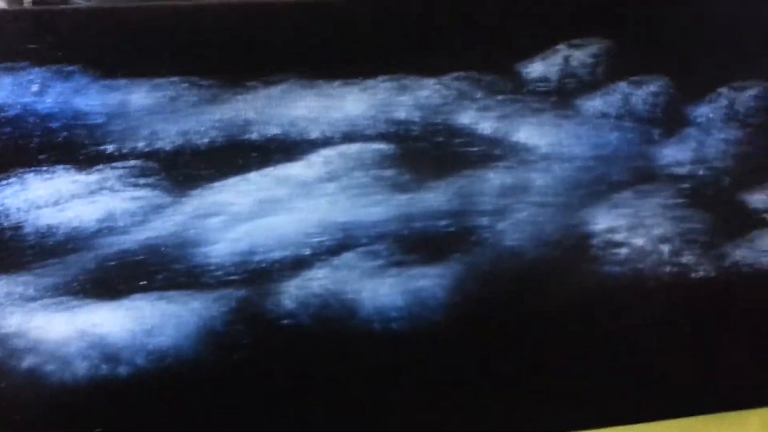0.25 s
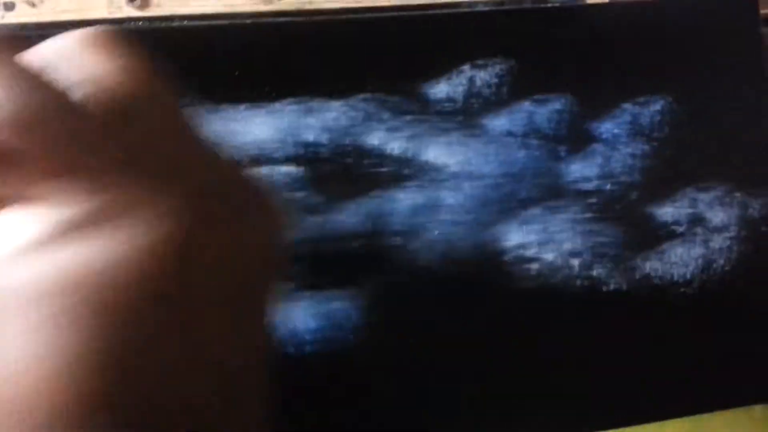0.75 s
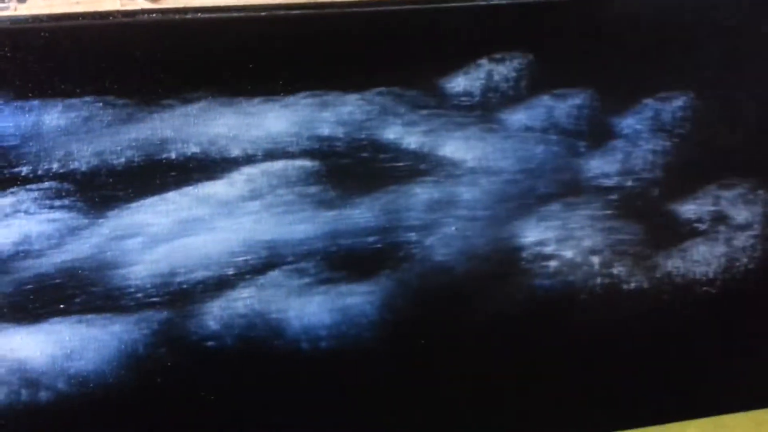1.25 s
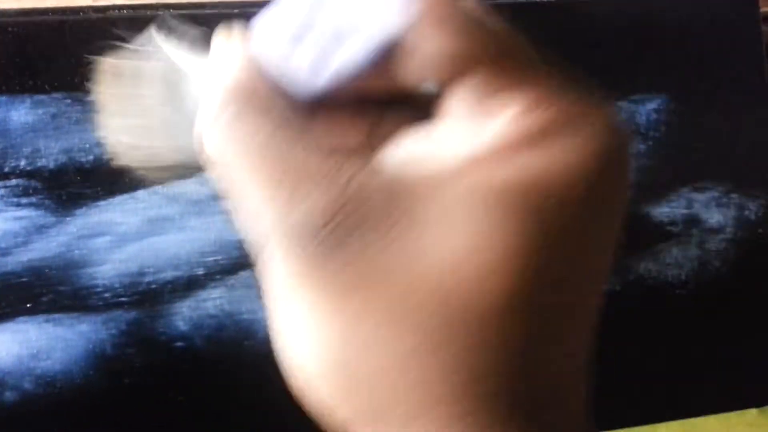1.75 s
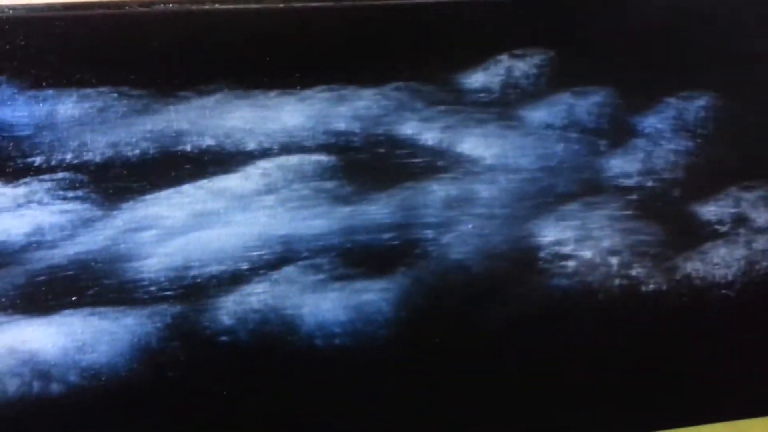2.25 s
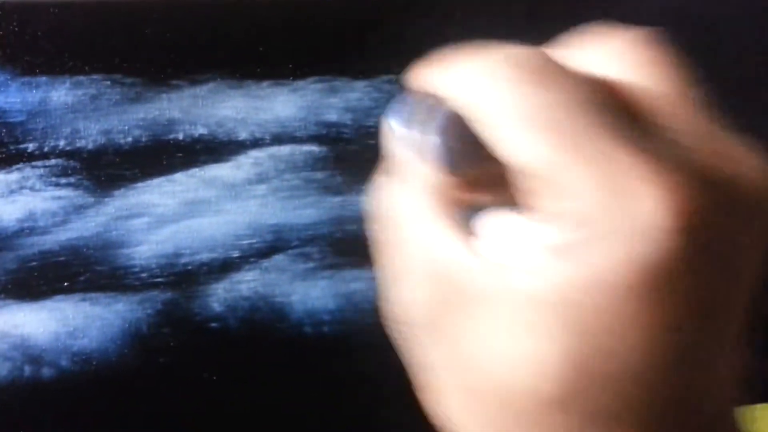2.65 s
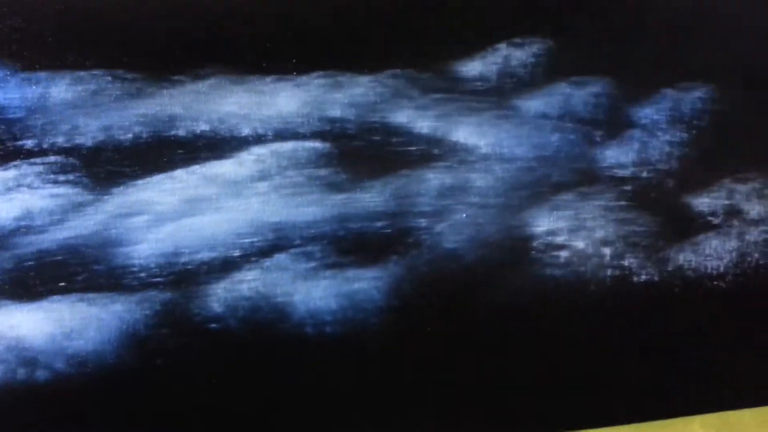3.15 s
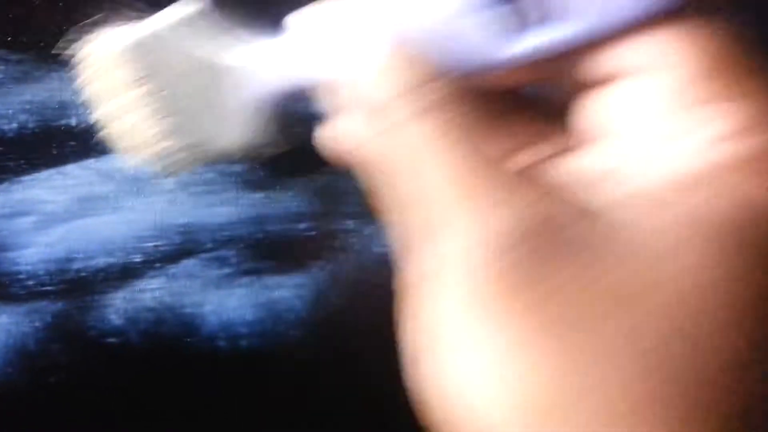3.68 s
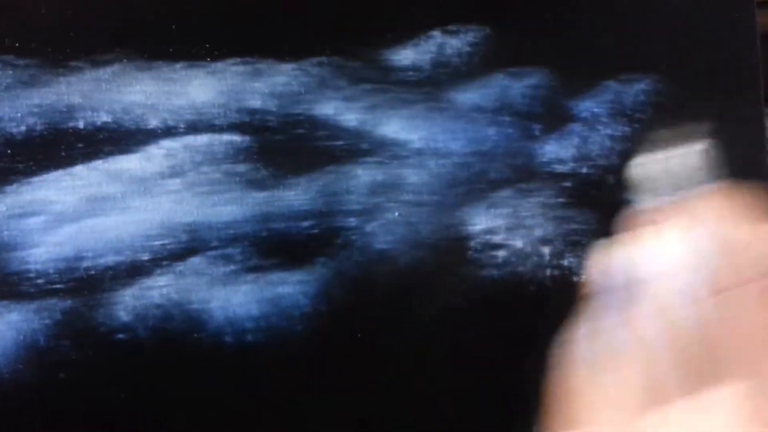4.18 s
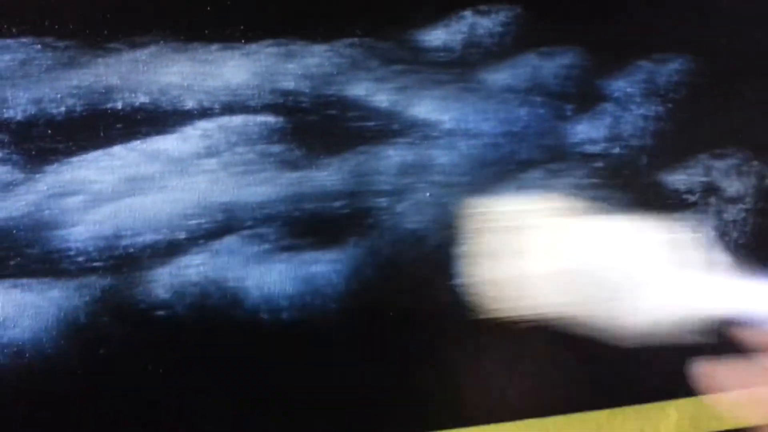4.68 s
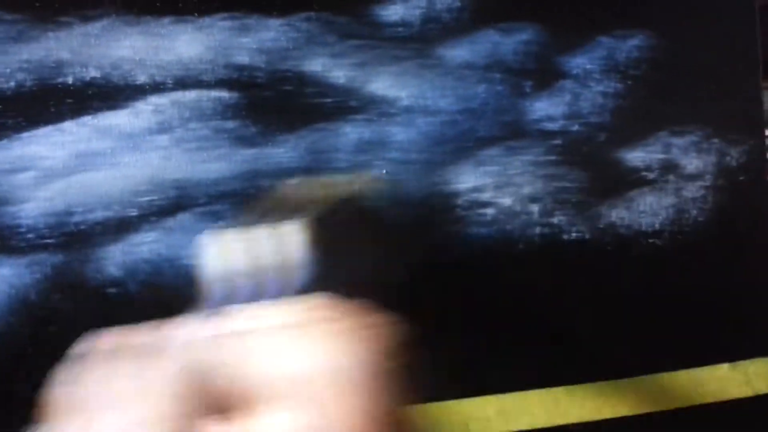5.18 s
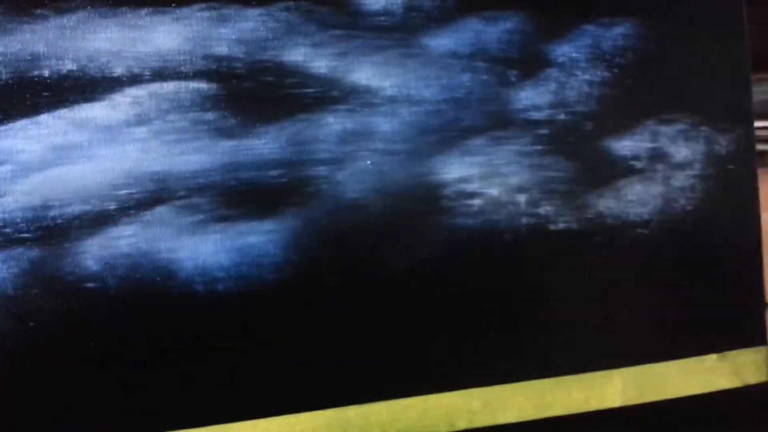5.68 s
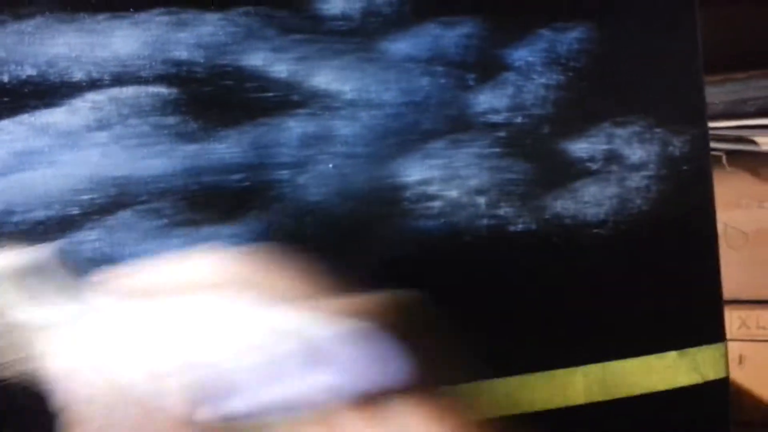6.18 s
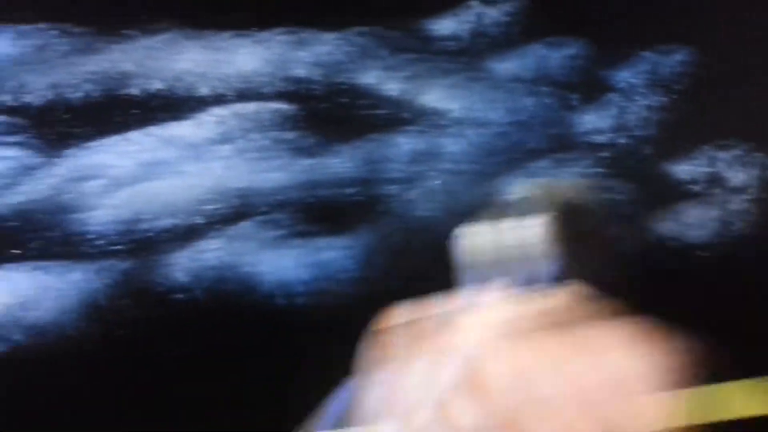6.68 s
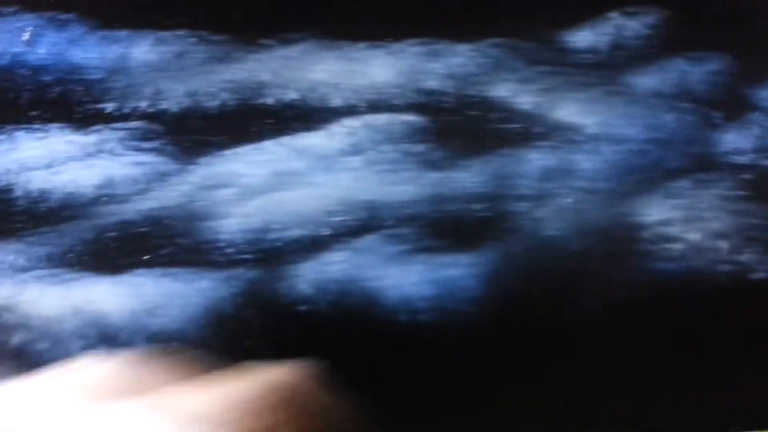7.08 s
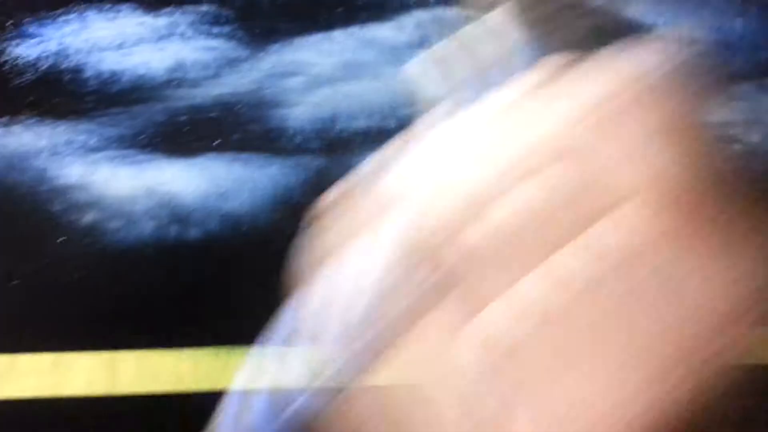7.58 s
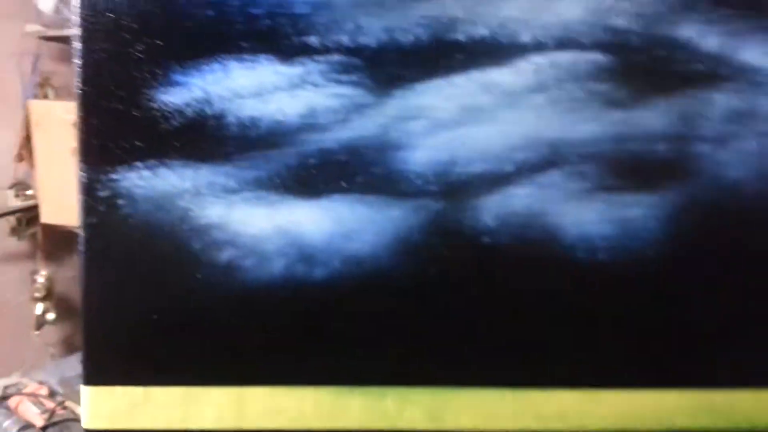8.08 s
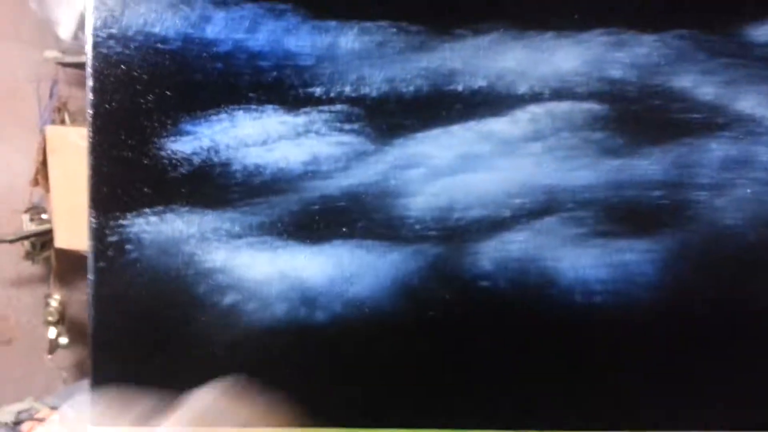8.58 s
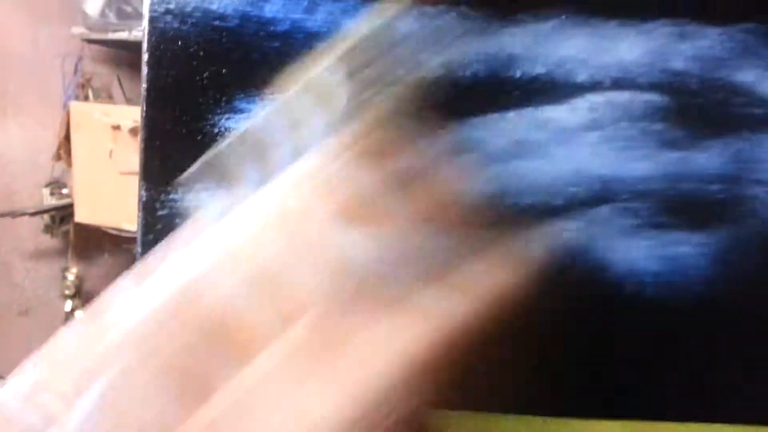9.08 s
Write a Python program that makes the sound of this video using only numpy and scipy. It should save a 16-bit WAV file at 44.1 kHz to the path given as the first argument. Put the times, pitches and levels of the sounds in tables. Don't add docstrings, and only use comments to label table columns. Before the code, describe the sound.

Close, scratchy brush strokes sweep left and right on taut canvas, growing faster and crisper, with soft frame bumps and distant engines droning beneath.

```python
import sys
import numpy as np
from scipy import signal
from scipy.fft import rfft, irfft, next_fast_len
from scipy.io import wavfile
from scipy.ndimage import map_coordinates

SR = 44100
rng = np.random.default_rng(int(sys.argv[2]) if len(sys.argv) > 2 else 0)


def dump(signal):
    limited = np.clip(np.atleast_2d(signal).T, -1, 1)
    pcm = np.round(limited * 32767).astype(np.int16)
    wavfile.write(sys.argv[1], SR, pcm)


def magnitude_from_level(level_db):
    exponent = np.asarray(level_db, float) / 20
    return 10 ** exponent


N = 411894
TIME, SIZE = np.arange(N) / SR, next_fast_len(N)
HZ = np.maximum(np.fft.rfftfreq(SIZE, 1 / SR), 1)

# landing, hardest moment and lift in seconds,
# landing level and hardest level in dB.
STROKES = [(0.0, 0.096, 0.242, -43.4, -36.0), (0.511, 0.693, 0.78, -50.5, -38.9),
           (1.071, 1.2, 1.33, -48, -36.5), (1.606, 1.813, 1.846, -46.5, -36), (2.125, 2.195, 2.3, -43, -39),
           (2.713, 2.86, 2.863, -42, -36.5), (3.072, 3.207, 3.26, -42.5, -37.5),
           (3.437, 3.694, 3.708, -48.5, -34.9), (3.94, 4.004, 4.051, -39.5, -34),
           (4.322, 4.444, 4.554, -42.5, -34), (4.701, 4.847, 4.927, -44, -33.5),
           (5.194, 5.301, 5.39, -42, -33.2), (5.575, 5.654, 5.742, -39.5, -33.5),
           (6.023, 6.122, 6.221, -40, -34), (6.43, 6.536, 6.543, -37.5, -30.5),
           (6.74, 6.879, 7.121, -43.5, -34), (7.274, 7.371, 7.404, -45.5, -33),
           (7.676, 7.795, 7.889, -42.9, -33), (8.011, 8.175, 8.221, -54, -33),
           (8.421, 8.459, 8.605, -44.7, -34.0), (8.815, 8.91, 8.938, -46.5, -32),
           (9.146, 9.187, 9.277, -49.5, -34)]
# moment the hand stops gaining speed in seconds,
# rate at landing, at that moment and at the lift in Hz.
THREAD_RATES = [(.14, 1450, 1960, 2020), (.62, 1000, 1200, 2100), (1.2, 1200, 1520, 1600),
                (1.68, 980, 1296, 1822), (2.22, 1557, 1370, 1140), (2.79, 950, 1230, 1850),
                (3.19, 1100, 1490, 1660), (3.52, 760, 1032, 1510), (4.0, 1600, 1967, 2060),
                (4.415, 1330, 1920, 1800), (4.84, 1250, 1977, 2097), (5.26, 1500, 1820, 1620),
                (5.68, 1380, 2000, 2000), (6.09, 1350, 1820, 1677), (6.46, 1700, 1902, 2250),
                (6.92, 1330, 2052, 900), (7.35, 1398, 1860, 2110), (7.76, 1600, 1920, 2030),
                (8.175, 900, 2000, 2203), (8.45, 1850, 1760, 1300), (8.88, 1560, 1930, 2220),
                (9.19, 1900, 1900, 1750)]
# middle in seconds, tone re scratch in dB, half length in seconds.
SINGING = [(.05, -7, .03), (.17, -6, .05), (.6, -8, .08), (.77, -4, .025), (1.15, -8, .03), (1.27, -4, .05),
           (1.66, -8, .05), (1.84, -13, .02), (2.23, -5, .035), (2.85, -6, .015), (3.15, -9, .03),
           (3.5, -8, .04), (3.69, -15, .02), (3.94, -4, .025), (4.02, -6, .03), (4.32, -4, .03),
           (4.43, -6, .06), (4.77, -5, .045), (4.86, -9, .035), (5.3, -8.5, .06), (5.6, -4, .04),
           (5.69, -8, .04), (6.04, -5, .02), (6.12, -7, .05), (6.44, -7, .03), (6.86, -10, .11),
           (8.15, -9, .05), (8.45, -5, .02), (8.885, -5, .025), (9.195, -5, .02)]
# frequency in Hz, density in dB per Hz.
SCRATCH_SPECTRUM = [(180, -17), (300, -10.5), (520, -13), (846, -7.5), (1590, -5), (1960, -4), (2160, -4),
                    (4410, -5.5), (6200, -10.5), (9920, -6), (14400, -7)]
# leftward, rightward; in dB per second, seconds and dB.
LANDING_DB_PER_S = (1700, 1100)
SETTLE_S = (.019, .04)
SETTLE_DB = (7.5, 8)
# share of bristle flick, of tip hiss and
# of finest hiss in dB.
GRIP_LEFTWARD = [
    (-8, -9, -15),
    (-10, -8, -17),
    (-5, -6.5, -14.5),
]
GRIP_RIGHTWARD = [
    (-9, -11, -19),
    (-9.5, -8.5, -12.5),
    (-7.5, -8, -11),
]
# time in seconds, finest hiss gain in dB.
ON_TIPS = [
    (0, -1.5),
    (.6, -5),
    (2.8, -4.5),
    (3.2, -2.5),
    (4.5, 4),
    (6.9, 4),
    (7.8, 2),
    (9.34, 3),
]
# time in seconds, right end and left end in ms.
TURNS = [(0, .2, -.25), (1.0, .25, -0.2), (2.1, .1, -.17), (2.7, .14, -0.11), (3.9, .14, -.2),
         (4.6, 0.33, -.24), (6.2, .28, -0.19), (7.4, 0.33, -0.076), (9.34, 0.31, -.14)]
# frequency in Hz, left minus right in dB.
LEFT_SHADE = [(370, -0.5), (690, -3.5), (1260, -6), (2320, -6.5), (4270, -10), (7860, -15), (14400, -17)]
# frequency in Hz, density in dB per Hz.
ROOM_SPECTRUM = [(15, -34), (25, -13.5), (134, -4), (204, -7), (387, -11), (454, -13.5), (592, -16.5),
                 (1090, -23), (1460, -21), (2010, -25), (2700, -25.5), (5680, -31), (6840, -30.5),
                 (14400, -28)]
# frequency in Hz, left-right likeness from 0 to 1.
ROOM_LIKENESS = [(60, 0.24), (130, 0.35), (290, 0.28), (630, 0.11), (1400, 0.018)]
# time in seconds, gain in dB.
RUMBLE_SWELL = [(0, 2), (.95, -1.5), (1.5, 2), (2.0, 1.5), (2.6, -0.6), (3.8, 1.8), (4.8, 3), (5.6, 1.7),
                (6.3, 2), (6.7, -1), (7.2, 2), (8.0, 0), (9.34, 1.5)]
# nearest moment in seconds, level in dB,
# time to lose half the amplitude's square root law in seconds.
LOW_PASSES = [(.7, -60, .5), (1.45, -60, .2), (2.0, -59, .2), (2.95, -53.5, .3), (3.7, -54.5, .5),
              (4.6, -56.5, .3), (5.5, -56.5, .35), (6.6, -55.5, .45), (7.6, -62, .4), (8.7, -62, .6)]
HIGH_PASSES = [(.8, -64, 0.49), (1.45, -58, .3), (2.25, -53, 0.46), (3.0, -62, .3), (5.0, -61, 0.49),
               (5.85, -60, .4), (7.2, -52.5, .12), (8.15, -54, .3), (8.9, -54.5, .55)]
# time in seconds, level in dB.
TYRE_WHINE = [
    (1.8, -95),
    (1.95, -69),
    (2.06, -75),
    (2.4, -90),
    (7.3, -90),
    (7.55, -70),
    (7.8, -95),
]
# time
# in seconds, peak in dB, ring in Hz, hiss share in dB, length in seconds.
KNOCKS = [(0.617, -40, 298, -20, 0.085), (1.061, -39.5, 300, -20, 0.065), (1.211, -32.5, 330.5, -20, 0.03),
          (1.372, -40, 348, -14, .011), (4.048, -41.5, 250.2, -21, 0.08), (4.093, -33, 1100, -28, .009),
          (4.222, -60, 600, 9, .03), (5.665, -27.5, 346, -22, 0.051), (5.888, -52, 596, 6.5, 0.024),
          (7.048, -41, 199.8, -20, .05), (7.17, -32, 250, -7.5, 0.031)]


def rms_one(x):
    return x / np.sqrt(np.mean(x ** 2) + 1e-20)


def in_time(rows):
    s, *columns = np.transpose(rows)
    return [np.interp(TIME, s, c) for c in columns]


def over_hz(points):
    hz, db = np.transpose(points)
    return np.interp(np.log(HZ), np.log(hz), db)


def shaped(x, gain):
    return irfft(rfft(x, SIZE) * gain, SIZE)[..., :N]


def drift(rate_hz):
    r = np.exp(-16 * np.pi * rate_hz / SR)
    noise = rng.standard_normal(N // 8 + SR // 4)
    slow = signal.lfilter([1], [1, -2 * r, r * r], noise)[SR // 8:]
    return np.interp(np.arange(N) / 8, np.arange(len(slow)), rms_one(slow))


def blurred(width_hz):
    return drift(width_hz) + 1j * drift(width_hz)


def pressure():
    early_swell = 0.46
    sag_db_per_s, last_dip_db, last_dip_s = 26, 0.9, .004
    lift_db_per_s, lift_s = 658, .052
    rows = []
    for k, (land, hard, lift, land_db, hard_db) in enumerate(STROKES):
        way = k % 2
        lift_db = hard_db - sag_db_per_s * (lift - hard)
        touch, touch_db = land - SETTLE_S[way], land_db - SETTLE_DB[way]
        rows += [(touch - (touch_db + 74) / LANDING_DB_PER_S[way], -80),
                 (touch, touch_db),
                 (land, land_db),
                 (land + (hard - land) / 3, land_db + early_swell * (hard_db - land_db)),
                 (hard, hard_db),
                 (lift - last_dip_s, lift_db),
                 (lift, lift_db - last_dip_db),
                 (lift + lift_s, lift_db - lift_db_per_s * lift_s),
                 (lift + lift_s + .025, -80)]
    return in_time(sorted(rows))[0]


def grip_in_time():
    ends = np.array(STROKES)[:, [0, 2]]
    times = ends[:, :1] + np.diff(ends) * [.15, .55, .95]
    grips = (list(GRIP_LEFTWARD) + list(GRIP_RIGHTWARD)) * (len(ends) // 2)
    flick, tip, finest = in_time(np.column_stack([times.ravel(), grips]))
    tips_db, = in_time(ON_TIPS)
    return flick, tip + 0.11 * tips_db, finest + tips_db


def ticks(per_s, spread_db):
    sizes = magnitude_from_level(spread_db * np.minimum(rng.exponential(1, N), 5)) * rng.choice([-1, 1], N)
    return rms_one(sizes * (rng.random(N) < per_s / SR))


def crossing():
    rows = []
    for (land, _, lift, *_), (turn, land_hz, turn_hz, lift_hz) in zip(STROKES, THREAD_RATES):
        rows += [(land, land_hz), (turn, turn_hz), (lift, lift_hz)]
    in_step = sum(magnitude_from_level(db) * np.exp(-((TIME - s) / half_s) ** 4 / 2) for s, db, half_s in SINGING)
    out_of_step = magnitude_from_level(-17)
    return in_time(rows)[0], 20 * np.log10(out_of_step + in_step)


def thread_tone(blur_hz, steady, overtones):
    hz, level_db = crossing()
    phase = 2 * np.pi * np.cumsum(hz * (1 + .012 * drift(20.45))) / SR
    level_db = np.clip(level_db - 3 + 1.5 * drift(20.0), -22, -4)
    line = magnitude_from_level(level_db) * np.real((steady + blurred(blur_hz)) * np.exp(1j * phase))
    for multiple, wide_hz, db in overtones:
        strand_gain = magnitude_from_level(db + level_db / 2 + 1.9 * drift(20.0))
        line += strand_gain * np.real(blurred(wide_hz) * np.exp(1j * multiple * phase))
    return line


def position():
    s, right_ms, left_ms = np.transpose(TURNS)
    ends = np.array(STROKES)[:, [0, 2]].ravel() + np.tile([-.02, .03], len(STROKES))
    at_right = np.arange(1, len(ends) + 1) // 2 % 2 == 0
    turn_ms = np.where(at_right, np.interp(ends, s, right_ms), np.interp(ends, s, left_ms))
    return np.interp(TIME, ends, turn_ms)


def at_ports(near, other, alike):
    lag_ms = position()
    fine = 2 * irfft(rfft(near, SIZE), 2 * SIZE)
    moved = map_coordinates(fine, [2 * np.arange(N) - 2 * SR * lag_ms / 1000], order=1, mode="nearest")
    left = alike * moved + np.sqrt(1 - alike ** 2) * other
    ratio = magnitude_from_level(over_hz(LEFT_SHADE))
    right_gain = 2 / np.sqrt(1 + ratio ** 2)
    return np.array([shaped(left, ratio * right_gain), shaped(near, right_gain)])


def brush(level_db):
    belly_db = -13.0 - 0.41 * (level_db + 43.5)
    shares = magnitude_from_level([np.minimum(belly_db, -4), *grip_in_time()])
    rest = np.sqrt(np.clip(1 - np.sum(shares ** 2, axis=0), .08, 1))
    low_passes = [1 / (1 + (HZ / edge_hz) ** 6) for edge_hz in (1347, 2780, 6200, 11070)]
    below = np.array([0 * HZ, *low_passes, 0 * HZ + 1])
    ranges = np.diff(below, axis=0) * magnitude_from_level(over_hz(SCRATCH_SPECTRUM))
    flutter = magnitude_from_level(0.82 * drift(29.0))
    strands = [(.86, 40, -14), (1.41, 40, -12), (2, 45, -9), (2.24, 50, -11)]   # multiple, width Hz, dB
    tone = thread_tone(blur_hz=40, steady=1.2, overtones=strands)
    gains = [shares[0], magnitude_from_level(-8.0) * rest, *shares[1:]]
    sides = []
    for tone_db in (-3.5, -30):
        parts = shaped(ticks(per_s=20000.0, spread_db=2.5), ranges)
        rub = sum(gain * magnitude_from_level(1.2 * drift(18.0)) * rms_one(part) for gain, part in zip(gains, parts))
        sides.append(magnitude_from_level(level_db) * (flutter * rub + magnitude_from_level(tone_db) * tone))
    return at_ports(*sides, alike=0.46)


def walls(dry, t60, level_db):
    t = np.arange(SR // 2) / SR
    tail = rng.standard_normal((2, len(t))) * magnitude_from_level(-60 * t / t60) * (t > .004)
    wet = shaped(dry.mean(axis=0), rfft(tail, SIZE) / (1 + HZ / 4000.0))
    return magnitude_from_level(level_db) * wet / np.sqrt(np.sum(tail[0] ** 2))


def passing(rows):
    power = sum(magnitude_from_level(2 * db) / (1 + ((TIME - s) / half_s) ** 2) ** 2 for s, db, half_s in rows)
    return 10 * np.log10(power)


def room_tone():
    alike = np.clip(over_hz(ROOM_LIKENESS), 0, 1)
    colour = magnitude_from_level(over_hz(ROOM_SPECTRUM))
    mid, side = rng.standard_normal((2, N))
    pair = shaped(mid, np.sqrt(1 + alike) * colour) + shaped(side, np.sqrt(1 - alike) * colour) * [[1], [-1]]
    swell_db, = in_time(RUMBLE_SWELL)
    air = magnitude_from_level(-54.5 - 3.0 + swell_db) * pair / pair.mean(axis=0).std()

    low_hz, high_hz = 83.0 - .6 * TIME, 126.0 - .38 * TIME
    low_phase = 2 * np.pi * np.cumsum(low_hz + 1.44 * drift(4.0)) / SR
    low = magnitude_from_level(passing(LOW_PASSES) + 0.86 * drift(1.3)) * np.sin(low_phase)
    phase = 2 * np.pi * np.cumsum(high_hz + 1.288 * drift(2.15)) / SR
    high_wave = np.sin(phase) + magnitude_from_level(-8.5) * np.sin(2 * phase)
    high = magnitude_from_level(passing(HIGH_PASSES) + 1.3 * drift(4.4)) * high_wave

    whine_db, = in_time(TYRE_WHINE)
    whine = magnitude_from_level(whine_db) * np.real(blurred(55) * np.exp(2j * np.pi * 1460 * TIME))
    return air + low + high + whine


def ducking(level_db, knee_db, slope, smooth_s):
    r = np.exp(-1 / (smooth_s * SR))
    return magnitude_from_level(signal.lfilter([1 - r], [1, -r], -slope * np.maximum(level_db - knee_db, 0)))


def knocks():
    out = np.zeros((2, N))
    t = np.arange(round(.2 * SR)) / SR
    for s, db, ring_hz, hiss_db, length in KNOCKS:
        shared, *own = rng.standard_normal((3, len(t)))
        envelope = np.exp(-(t / length) ** 1.5) * np.minimum(t / 0.0025, 1)
        burst = (shared + 0.65 * np.array(own)) * envelope
        frame = signal.butter(1, [ring_hz / 1.6, ring_hz * 1.6], "band", fs=SR, output="sos")
        body = signal.sosfilt(frame, burst)
        dull = signal.sosfilt(signal.butter(1, 5000., fs=SR, output="sos"), burst)
        at = round(s * SR)
        knock = body / abs(body).max() + magnitude_from_level(hiss_db) * dull / abs(dull).max()
        out[:, at:at + len(t)] += magnitude_from_level(db) * knock
    return out


def scene():
    level_db = pressure() + 0.8
    near = brush(level_db) + knocks()
    ducked = ducking(level_db, knee_db=-58.5, slope=0.42, smooth_s=0.0023) * room_tone()
    return near + walls(near, t60=0.43, level_db=-18.5) + ducked


def low_pass(x):
    return signal.sosfilt(signal.butter(12, 15050, fs=SR, output="sos"), x)


def record(dry):
    passed = shaped(dry, (HZ < 14580) / (1 + (45 / HZ) ** 2))
    return low_pass(passed)


dry = scene()
out = record(dry)
dump(out)
```